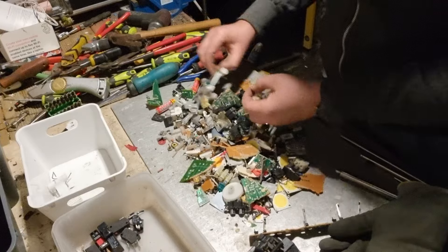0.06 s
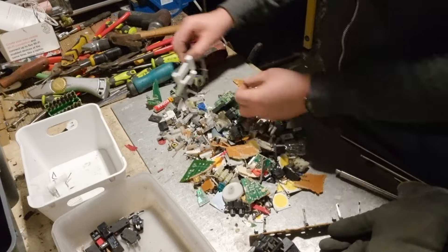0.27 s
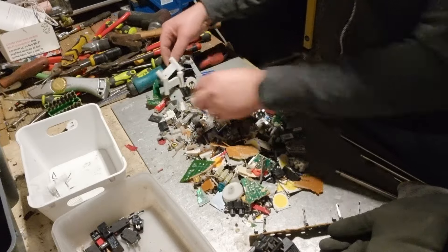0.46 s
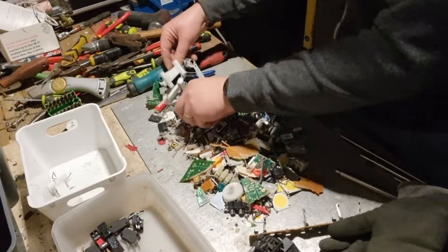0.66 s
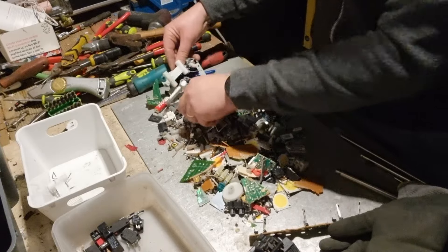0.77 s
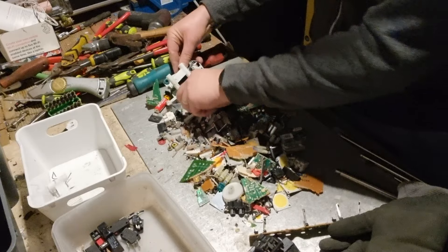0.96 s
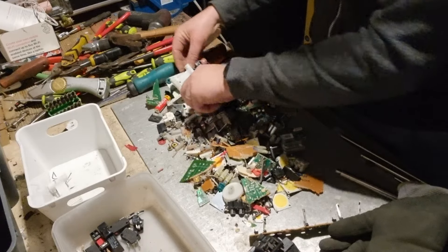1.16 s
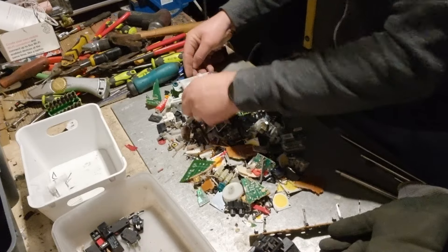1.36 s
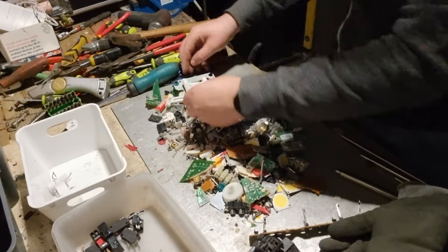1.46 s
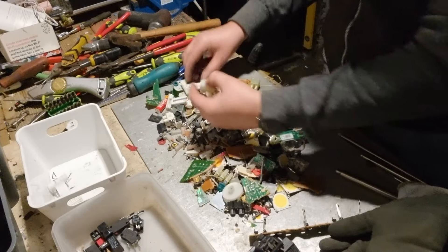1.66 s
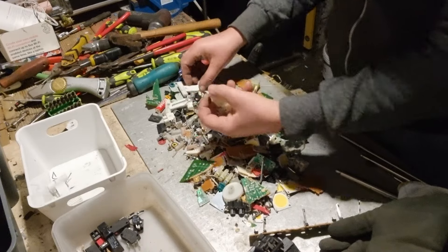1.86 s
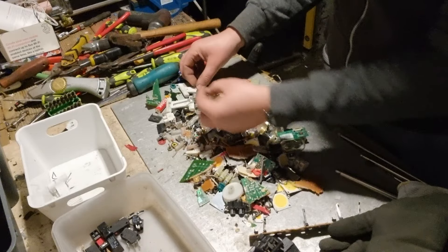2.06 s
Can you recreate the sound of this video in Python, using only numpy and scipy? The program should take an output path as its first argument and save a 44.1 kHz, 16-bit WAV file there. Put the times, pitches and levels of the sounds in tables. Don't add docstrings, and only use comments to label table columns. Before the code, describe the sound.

Small metal and circuit-board pieces clatter, click and chink as hands sort a heap on a metal bench, busiest early, sparser near the end, then a firm knock; close stereo pickup in a small damped workshop.

```python
import sys
import numpy as np
from scipy import signal
from scipy.fft import rfft, irfft
from scipy.io import wavfile
from scipy.ndimage import uniform_filter1d

SR = 44100
rng = np.random.default_rng(int(sys.argv[2]) if len(sys.argv) > 2 else 0)


def makeup_ratio(level_db):
    decades = np.asarray(level_db, float) / 20
    return 10 ** decades


def transcribe(u):
    v = np.clip(np.atleast_2d(u).T, -1, 1)
    q = np.round(v * 32767).astype(np.int16)
    wavfile.write(sys.argv[1], SR, q)


N = 92610

# (frequency [Hz], level [dB])
AIR_COLOUR = [(30, -14), (124, 8.5), (600, -26), (1070, -7), (2540, -27), (7470, -51), (16000, -28)]
# (time [s], peak [dB], frequency [Hz])
FRAME_THUMPS = [
    (0.589, -40, 74),
    (0.781, -51.5, 88),
    (1.014, -50.5, 72),
    (1.228, -54, 94),
    (1.395, -54.5, 86),
    (1.81, -56.5, 76),
]
# (time [s], rustle level [dB])
STIR_LEVEL = [(0, -50), (.08, -62), (0.191, -51.5), (.5, -59.5), (.6, -57.5), (.87, -57.5), (1.0, -57.5),
              (1.11, -60), (1.3, -48), (1.43, -48.5), (1.479, -63), (1.6, -71.5), (1.74, -72),
              (1.789, -57.5), (2.1, -54)]
# (time [s], level [dB], frequency [Hz])
BENCH_KNOCKS = [(0.111, -36, 1064), (0.229, -40, 1034), (0.338, -30.5, 1080), (0.355, -24.5, 1060),
                (0.378, -28, 507), (0.41, -25.5, 1043), (0.608, -34, 1240), (0.672, -35.5, 1054),
                (0.769, -27.5, 1055), (0.782, -26, 728), (0.875, -37.5, 1004), (0.961, -44, 990),
                (1.168, -40, 1000), (1.219, -30, 730), (1.308, -50, 706), (1.341, -28, 865),
                (1.358, -29, 1074), (1.402, -31, 1030), (1.489, -37.5, 684), (1.759, -49, 735),
                (1.773, -36, 675), (1.8, -20.5, 653), (2.029, -47, 710), (2.043, -32.5, 1080)]
# (time [s], level [dB], frequency [Hz])
BOARD_TAPS = [(0.112, -44, 2430), (0.2348, -30.5, 2496), (0.3564, -31, 1690), (0.3784, -23.5, 1704),
              (0.4114, -29, 1697), (0.547, -35, 2800), (0.61, -26.5, 1735), (0.6725, -41, 1800),
              (0.7362, -39, 1490), (0.7692, -27, 2134), (0.899, -40, 1890), (0.919, -29, 1543),
              (0.9597, -37, 2300), (1.0355, -27.5, 2290), (1.2047, -40, 1460), (1.2201, -27, 2820),
              (1.297, -54, 2320), (1.3139, -44, 2560), (1.8026, -21.5, 1773), (1.965, -33.5, 1800)]
# (time [s], level [dB], frequency [Hz])
METAL_CHINKS = [(0.0443, -28.5, 6020), (0.1103, -29, 3220), (0.1436, -19.5, 7650), (0.2018, -25, 3470),
                (0.2324, -15, 4000), (0.3562, -23, 3210), (0.413, -4, 5420), (0.5482, -31, 3930),
                (0.7356, -31, 7580), (0.7687, -16, 5790), (0.9213, -29, 4970), (0.9367, -34, 3980),
                (0.9607, -20, 5230), (1.0375, -28, 3270), (1.04, -22, 5570), (1.1757, -25, 4270),
                (1.2194, -34, 2930), (1.3417, -19, 5800), (1.491, -32, 4200), (1.5614, -30, 5820),
                (1.7626, -43.5, 5000), (1.8018, -42, 4520), (1.973, -33, 4250), (2.0306, -32, 5860)]
# (time [s], level [dB], frequency [Hz])
LONE_RINGS = [
    (0.144, -37, 12000),
    (1.312, -39, 2150),
    (1.43, -33, 3600),
    (2.046, -39, 4240),
    (1.812, -28.5, 677),
    (1.825, -31.5, 580),
    (0.15, -39.5, 706),
    (.571, -35, 493),
    (1.996, -41, 5500),
]
# (time [s], peak [dB], bench share [dB], sparkle share [dB], rattle share [dB])
PIECE_CLACKS = [(0.0064, -37.5, -36, -7, -8.5), (0.0462, -29, -44, -4.5, -16.5),
                (0.113, -31, -15.5, -3, -16), (0.1417, -37, -52, 3, -13),
                (0.2031, -31, -12.5, -4.5, -12.5), (0.2292, -26.5, -9.5, -11.5, -14),
                (0.2339, -26, -12, -8, -12), (0.2612, -29.5, -9.5, -6.5, -13.5),
                (0.3556, -29, -5, -35.5, -11), (0.379, -28, -4, -16, -13), (0.4126, -8.5, -19, 1, -19),
                (0.4677, -43, -3, -25, -10.5), (0.5487, -36.5, -2.5, -5, -11),
                (0.5773, -36, 2, -4, -17.5), (0.609, -50.5, 17, -27, -18.5),
                (0.6386, -41, -24, 7.5, -15.5), (0.6733, -49, 3.5, 4, -14.5),
                (0.719, -46.5, 4, -21, -13.5), (0.7361, -34.5, -5, -4, -12.5),
                  (0.7597, -22, -9, -26, -15), (0.769, -14.5, -18, -20, -22.5),
                  (0.7849, -33.5, -0.5, -11, -11.5), (0.8216, -36.5, -7, -3.5, -13),
                  (0.9011, -44.5, 0, -18, -10), (0.919, -33, -3, -3, -15.5),
                  (0.9388, -28, -56, -2.5, -13.5), (0.9552, -20, -11, 2.5, -18.5),
                  (0.9587, -30.5, -20, 0, -7.5), (1.0279, -33.5, -8, -2, -10.5),
                  (1.043, -26.5, -6, -6, -15.5), (1.1328, -44, -11.5, -6, -8),
                  (1.1647, -35, -3.5, -3.5, -14.5), (1.1754, -29.5, -13, -4.5, -14),
                  (1.2194, -21.5, -8, -5.5, -16),
                (1.2542, -41.5, -21, 5.5, -10.5), (1.2768, -45, -45, 0, -16),
                  (1.2976, -35.5, -7, -11, -16.5), (1.3129, -42, 8, -23, -15.5),
                  (1.3405, -27, -6, 4.5, -17.5), (1.3578, -31, -2, -24, -18.5),
                  (1.4004, -30, -35, 4, -17.5), (1.4272, -36, -22, -2, -12.5),
                  (1.4902, -35, -13, 5.5, -13.5), (1.5103, -34, -7, -3, -15), (1.5537, -39, -10, -3, -13),
                  (1.5608, -30.5, -9, -9, -25.5), (1.6451, -45.5, -45, -24.5, -15),
                  (1.7647, -39.5, -13, -18, -14), (1.7736, -44, -8, 2, -10),
                  (1.7948, -30.5, -8, -29, -11.5), (1.8, -21.5, 2, -33, -22.5),
                  (1.8134, -28.5, -3.5, 4.5, -13.5), (1.8366, -23.5, -7, -8, -24),
                  (1.8918, -38.5, -3, -25, -17), (1.9204, -41.5, -8, -8, -10),
                  (1.97, -33.5, -8, -30.5, -15), (2.0308, -37.5, -20, -21, -11.5),
                  (2.0467, -33, -8.5, -4, -19)]
# (frequency [Hz], level [dB])
BENCH_MODES = [(250, -1.5), (320, -4.5), (500, 0.5), (585, -25.5), (670, -4.5), (725, 2.5), (900, -2.5),
               (1045, 5), (1222, -1.5), (1500, -9), (1745, -1), (2125, -2), (2490, -4.5)]
# (frequency [Hz], level [dB])
PART_RINGS = [(3230, -11), (3640, 3.5), (4250, -7), (4480, 3), (5320, -20), (5790, 3), (7380, 6.5),
              (7600, -18)]
# (frequency [Hz], level [dB])
PART_COLOUR = [(300, -46.5), (1000, -9.5), (2000, -11.5), (3600, -3.5), (5400, -2), (7700, -7),
               (8200, -17.5), (11000, -26.5)]
# (frequency [Hz], level [dB])
SPARKLE_COLOUR = [(6000, -106), (8200, 12), (10000, 11.5), (12500, 13.5), (15000, 12.5)]
# (frequency [Hz], phase [rad])
PORT_LEAD = [(100, 0.3), (430, 0.71), (2150, 0.4), (3600, 1.5), (5400, 2), (7200, 2.1), (12000, 2.3),
             (16000, 1.3)]
# (frequency [Hz], level [dB])
PORT_TILT = [(100, -3.5), (400, 0.5), (1400, -2), (2800, 0.5), (5400, -3), (9000, -0.5), (14000, -0.1)]

AIR_DB = -74.5
THUMP_RISE_S, THUMP_T60_S, THUMP_SAG = 0.0063, 0.38, 0.071
RUMBLE_HZ, RUMBLE_DB = 106, -64.5
TICKS_PER_S, TICK_SPREAD_DB, RUSTLE_PART_DB, RUSTLE_BENCH_DB, RUSTLE_SPARKLE_DB = 2500, 5.5, -6, -8, -10.5
NOTE_RISE_S, WOBBLE_RAD = 0.00058, 0.8
SLIDE_IN_S, SLIDE_IN_DB, CONTACT_LAG_S, RATTLE_T60_S = 0.0061, -3, 0.000987, 0.094
REBOUND_S, REBOUND_DB, BOUNCE_SPAN_S, BOUNCE_DB = 0.0011, -8, 0.0034, -12.5
HEAP_SPOTS, SPOT_DB = 8, 2.5
RING_DB, RING_T60_S, BENCH_DB, BENCH_T60_S = -16.5, 0.05, -2.5, 0.053
ROOM_DB, ROOM_T60_S, ROOM_GAP_S = -6, 0.088, 0.0004
LOW_CUT_HZ, PLACE_LAG_S = 321, 0.00003


def read(table, hz):
    points = np.array(table, float)
    return np.interp(np.log(hz + 1), np.log(points[:, 0]), points[:, 1])


def colour(x, table):
    cepstrum = irfft(np.log(makeup_ratio(read(table, np.linspace(0, SR / 2, 513)))))
    cepstrum[1:512] *= 2
    cepstrum[513:] = 0
    h = irfft(np.exp(rfft(cepstrum)))[:512]
    return signal.fftconvolve(x, h / np.abs(h).max())[:N]


def fade(t, t60):
    return np.exp(-np.log(1000) * t / t60)


def modes(table, span_s):
    t = np.arange(int(span_s * SR)) / SR
    h = sum(makeup_ratio(db) * np.sin(2 * np.pi * hz * t) * fade(t, t60) for hz, db, t60 in table)
    return h / np.abs(h).max()


def walk(rate_hz):
    hold = int(SR / rate_hz)
    return uniform_filter1d(np.repeat(rng.standard_normal(N // 20), hold)[:N], hold)


def body(push, spot_db=np.zeros(30)):
    n = push.shape[1]
    part, bench, sparkle = push
    ring = modes([(hz, db + d, RING_T60_S) for (hz, db), d in zip(PART_RINGS, spot_db[15:])], 0.086)
    top = modes([(hz * (1 + d / 150), db + d, BENCH_T60_S)
                 for (hz, db), d in zip(BENCH_MODES, spot_db[::-1])], 0.2)
    out = colour(part, PART_COLOUR)[:n] + colour(sparkle, SPARKLE_COLOUR)[:n]
    out = out + makeup_ratio(RING_DB) * signal.fftconvolve(part, ring)[:n]
    return out + makeup_ratio(BENCH_DB) * signal.fftconvolve(bench, top)[:n]


def air():
    mid = colour(rng.standard_normal(N), AIR_COLOUR)
    side = colour(rng.standard_normal(N), AIR_COLOUR)
    x = (mid + 0.1 * side * np.array([[1], [-1]])) * makeup_ratio(walk(7.7))
    return x * makeup_ratio(AIR_DB) / np.sqrt(np.mean(x ** 2))


def thumps():
    t, out = np.arange(N) / SR, 0
    for s, db, hz in FRAME_THUMPS:
        late = np.maximum(t - s, 0)
        turns = hz * (late + THUMP_SAG * 0.057 * (1 - np.exp(-late / 0.03)))
        swell = (1 - np.exp(-late / THUMP_RISE_S)) * fade(late, THUMP_T60_S)
        out = out + makeup_ratio(db) * swell * np.sin(2 * np.pi * turns)
    band = signal.butter(2, [RUMBLE_HZ / 2, RUMBLE_HZ * 1.67], "band", fs=SR, output="sos")
    tremble = signal.sosfilt(band, rng.standard_normal(N))
    return out + makeup_ratio(RUMBLE_DB) * tremble / np.std(tremble)


def rustle():
    size_db = TICK_SPREAD_DB * np.minimum(rng.exponential(size=(3, N)), 3)
    struck = rng.random((3, N)) < TICKS_PER_S / SR
    ticks = struck * makeup_ratio(size_db) * np.sign(rng.standard_normal((3, N)))
    stir = np.array(STIR_LEVEL, float)
    stir_db = np.interp(np.arange(N) / SR, stir[:, 0], stir[:, 1])
    share_db = np.array([[RUSTLE_PART_DB], [RUSTLE_BENCH_DB], [RUSTLE_SPARKLE_DB]])
    return body(ticks / np.std(ticks) * makeup_ratio(stir_db + share_db))


def struck_notes():
    n = SR // 6
    t, shake, out = np.arange(n) / SR, walk(400), np.zeros(N + SR)
    # events, share dB, t60 s, shake dB
    families = [(BENCH_KNOCKS, -3, 0.035, 1.5), (BOARD_TAPS, -6, 0.03, 2),
                (METAL_CHINKS, -9, 0.04, 2.5), (LONE_RINGS, 0, 0.045, 2)]
    k = 0
    for events, share_db, t60, shake_db in families:
        for s, db, hz in events:
            i = int(s * SR)
            k = (k + 7919) % (N - 2 * n)
            rough = makeup_ratio(shake_db * shake[k:k + n])
            wobble = WOBBLE_RAD * shake[k + n:k + 2 * n]
            swell = (1 - np.exp(-t / NOTE_RISE_S)) * fade(t, t60)
            out[i:i + n] += makeup_ratio(db + share_db) * rough * swell * np.sin(2 * np.pi * hz * t + wobble)
    return out[:N]


def clacks():
    n, lead = SR // 4, SR // 40
    t, out = (np.arange(n) - lead) / SR, np.zeros((HEAP_SPOTS, N + SR))
    slide = makeup_ratio(SLIDE_IN_DB) / 2 * np.exp(np.minimum(t, 0) / SLIDE_IN_S)
    rattle = fade(abs(t), RATTLE_T60_S) + 0.5 * fade(abs(t), 0.004)
    shape = np.where(t < 0, slide, rattle)
    events = PIECE_CLACKS
    for k, (s, db, bench_db, sparkle_db, rattle_db) in enumerate(events):
        when, sign = rng.random((2, 5))
        noise = rng.standard_normal((4, n))
        grit = makeup_ratio(2.45 * noise[3] + 2.48 * np.repeat(noise[3], 64)[:n])
        push = makeup_ratio(rattle_db) * noise[:3] * shape * grit
        push[:, lead] = 1.3
        push[:, lead + int(REBOUND_S * SR)] = -2 * makeup_ratio(REBOUND_DB)
        bounce = (when ** 2 * BOUNCE_SPAN_S * SR).astype(int) + lead + 20
        push[:, bounce] += makeup_ratio(BOUNCE_DB - 20 * when) * np.sign(sign - 0.5)
        level = makeup_ratio(db + np.array([[0], [bench_db], [sparkle_db]]))
        i = int((s + CONTACT_LAG_S) * SR)
        out[k % HEAP_SPOTS, i:i + n] += body(level * push, SPOT_DB * rng.standard_normal(30))
    return out[:, lead:lead + N]


def room(near):
    t = np.arange(SR // 3) / SR
    walls = rng.standard_normal((len(near), 2, len(t))) * fade(t, ROOM_T60_S) * (t > ROOM_GAP_S)
    walls = walls - uniform_filter1d(walls, size=32, axis=2) / 2
    walls = makeup_ratio(ROOM_DB) * walls / np.sqrt(np.sum(walls ** 2, axis=2)[:, :, None])
    return signal.fftconvolve(near[:, None], walls, axes=2)[:, :, :N].sum(axis=0)


def scene():
    near = np.vstack([clacks(), rustle() + struck_notes()])
    near = signal.sosfilt(signal.butter(3, LOW_CUT_HZ, "high", fs=SR, output="sos"), near)
    hz, half = np.arange(N + 1) * SR / (2 * N), np.array([[0.5], [-0.5]])
    ports = makeup_ratio(half * read(PORT_TILT, hz)) * np.exp(1j * half * read(PORT_LEAD, hz))
    lag_s = PLACE_LAG_S * np.sin(2.325 * np.arange(len(near)))[:, None]
    direct = (rfft(near, 2 * N) * np.exp(2j * np.pi * hz * lag_s * half[:, None])).sum(axis=1)
    shared = rfft(thumps() + room(near), 2 * N)
    scatter = rustle()
    scatter = scatter - uniform_filter1d(scatter, size=48)
    return irfft((direct + shared) * ports)[:, :N] + air() + half * scatter


def roll_off(x):
    return signal.sosfilt(signal.butter(12, 16980, fs=SR, output="sos"), x)


def record(dry):
    mix = signal.sosfilt(signal.ellip(8, 0.2, 35, 15900, fs=SR, output="sos"), dry)
    return roll_off(mix)


dry = scene()
out = record(dry)
transcribe(out)
```